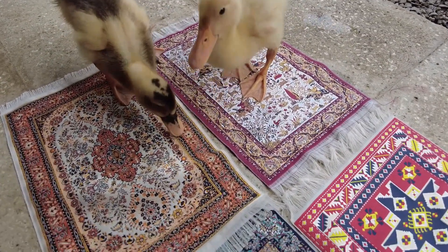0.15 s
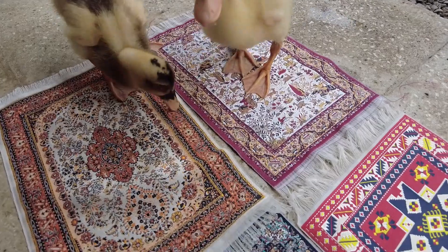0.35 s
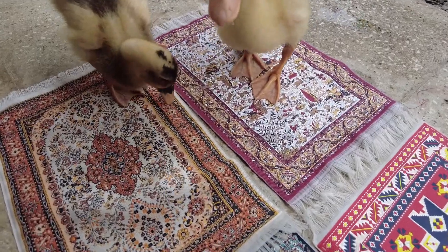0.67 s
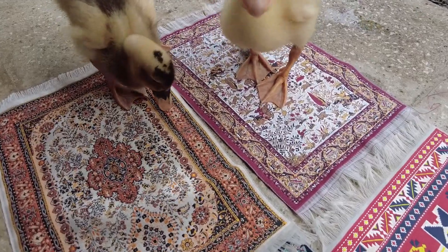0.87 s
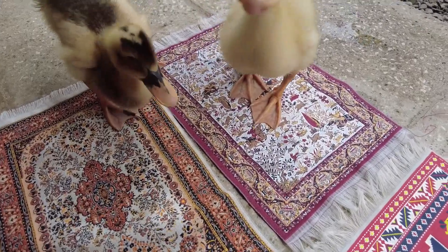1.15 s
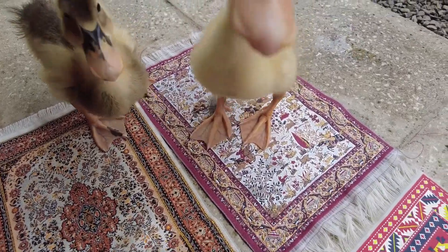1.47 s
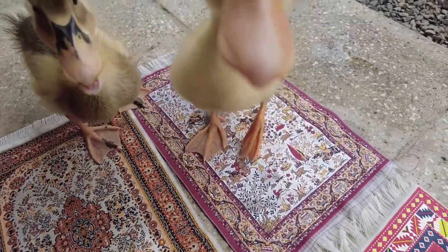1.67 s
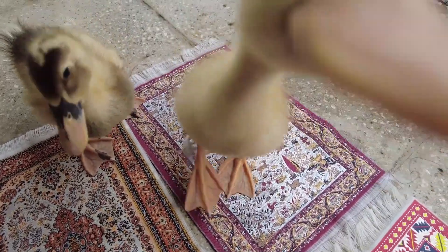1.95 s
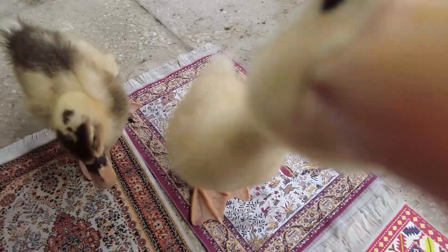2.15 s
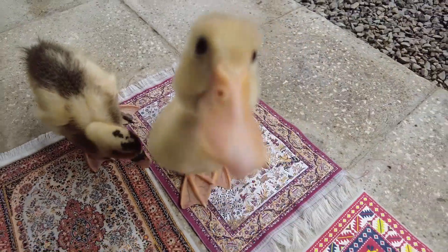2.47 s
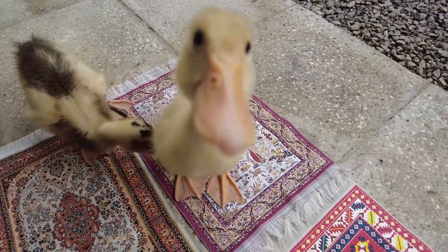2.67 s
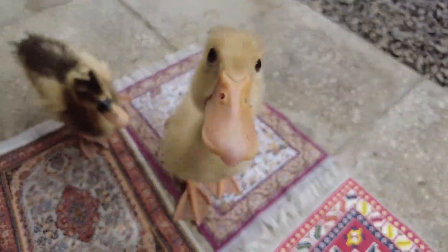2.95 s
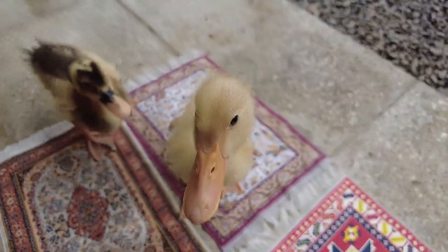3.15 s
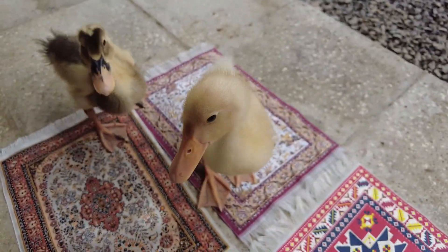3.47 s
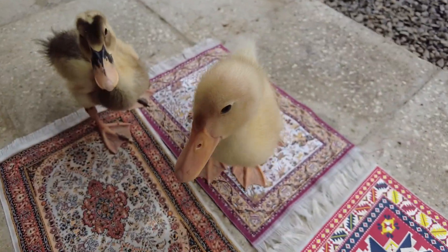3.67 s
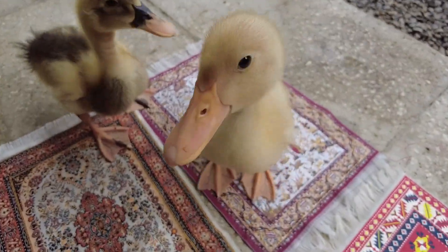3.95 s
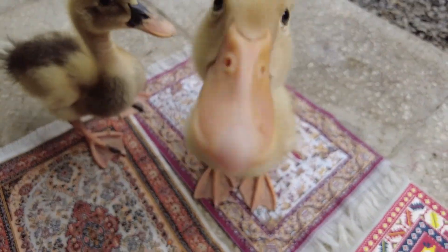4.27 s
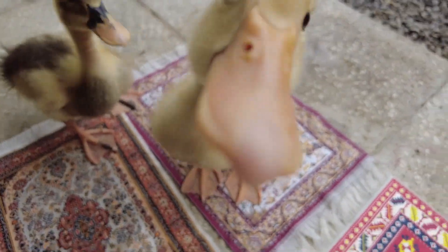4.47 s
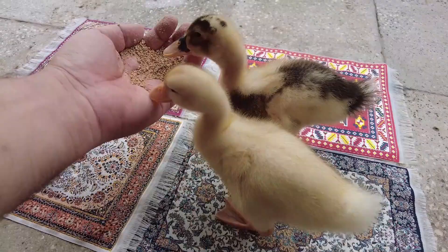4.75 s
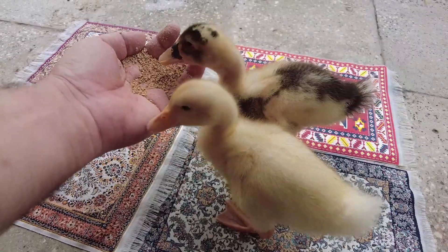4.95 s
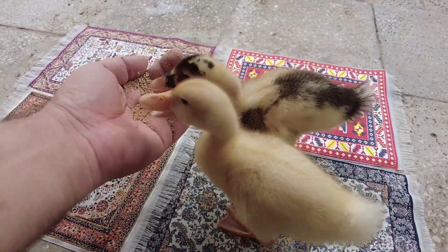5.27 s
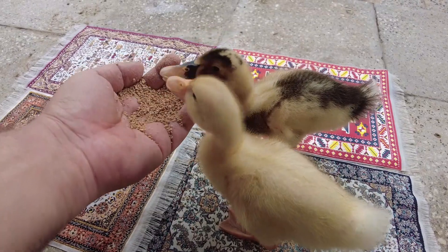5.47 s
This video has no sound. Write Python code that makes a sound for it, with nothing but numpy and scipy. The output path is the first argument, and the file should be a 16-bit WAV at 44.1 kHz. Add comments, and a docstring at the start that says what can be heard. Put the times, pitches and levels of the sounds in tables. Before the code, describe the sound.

Two ducklings peep close to a hand-held microphone in a sheltered yard, over a low rumble. One gives quick, loud, high calls with a raspy edge; the other answers with softer, cleaner, lower peeps. A bump thuds on the microphone, and the loud calls become lower and less regular. A faint hand rustle and a few bill taps follow. Near the end the peeping stops, leaving very faint nibbling.

```python
"""Two ducklings on rugs in a sheltered concrete yard, close to a hand-held microphone, over a low rumble.
From the start one peeps loudly: arched syrinx whistles, overdriven into a rasp at the summit.
From 0.5 s the other answers with soft, clean, lower peeps. At 2.1 s a bump thuds on the microphone;
the loud peeps then drop in pitch. The hand rustles at 3 s, and bills tap near 3.7 s.
After 4.8 s the peeps stop, leaving faint nibbling and one thin, far note."""
import sys
import numpy as np
from scipy import signal
from scipy.fft import rfft, irfft
from scipy.io import wavfile
from scipy.ndimage import uniform_filter1d

SR = 44100
rng = np.random.default_rng(int(sys.argv[2]) if len(sys.argv) > 2 else 0)


def master(y):
    """Save y as 16-bit WAV."""
    cut = np.clip(np.atleast_2d(y).T, -1, 1)
    pcm = np.round(cut * 32767)  # scale
    wavfile.write(sys.argv[1], SR, pcm.astype(np.int16))


N = 247842
TIME_S = np.arange(N) / SR

# stereo noise: freq_hz, left_right_correlation
COHERENCE = [(30, 0.98), (120, 0.97), (260, 0.74), (550, 0.21), (1200, 0.33), (3000, 0.32), (8000, 0.09),
             (16000, 0.17)]
# noise spectra: freq_hz, density_db
YARD_SPECTRUM = [(38, -32), (65, -6.5), (92, -2.5), (183, -9.5), (651, -22.5), (765, -25.5), (1560, -19.5),
                 (1840, -25), (2360, -28.5), (3420, -32.5), (4610, -36.5), (10600, -68), (11900, -68.5),
                 (14900, -47.5), (16000, -51)]
RUMBLE_SPECTRUM = [(15, -3.5), (28, 9), (42, 5.5), (60, -8), (90, -24.5), (200, -61.5)]
RUSTLE_SPECTRUM = [(700, -12.5), (1500, -9.5), (3000, -1), (6000, 7.5), (9000, 2.5), (12000, -2),
                   (16000, -6)]
RASP_SPECTRUM = [(200, -38.5), (520, -18.5), (900, -26.5), (1400, -20), (1900, -11), (2450, -18),
                 (3150, 6.5), (3550, -0.5), (3820, -9.5), (4300, -9), (4800, -26.5), (5800, -35.5),
                 (9000, -69)]
HISS_SPECTRUM = [(3500, -22.5), (5000, -8.5), (5800, -10.5), (7000, -1.5), (7750, 6), (8300, -6.5),
                 (9200, -7), (11800, -13), (14000, -12), (15300, -4), (16500, -9.5)]
# distant hum: pitch_hz, level_db
HUM_TONES = [(100, -65.5), (173, -67), (252, -71)]
# handling rumble: time_s, level_db
RUMBLE_LEVELS = [(0.0, -58), (0.04, -48), (0.12, -55), (1.42, -44.5), (1.67, -59), (1.71, -49), (3.72, -47),
                 (3.9, -54), (4.02, -38.5), (4.52, -54), (5.38, -52), (5.62, -61.5)]
# hand rustles: peak_s, level_db
HAND_RUSTLES = [(2.15, -82.5), (3.03, -71.5), (3.599, -77.5)]
# impacts and hard peep onsets: start_s, level_db
HAND_TICKS = [(2.0951, -46), (2.3002, -42.5), (3.2093, -42.5), (3.6586, -40), (4.821, -51.5)]
MIC_BUMPS = [(2.092, -22.5)]
BILL_TAPS = [(3.6525, -36), (3.6583, -27), (3.7253, -26), (3.7473, -25.5)]
DRY_CLICKS = [(4.57, -39.5), (4.742, -43)]
HARD_ONSETS = [(0.268, -41.5), (0.85, -41), (1.229, -36), (1.614, -38)]
# struck resonances: freq_hz, gain_db, t60_s
HOUSING_MODES = [(122.5, -13.5, 0.09), (251, 2, 0.041), (404, 7, 0.041), (499, 0, 0.065), (615, -4, 0.051),
                 (1314, -19, 0.061)]
BILL_TAP_MODES = [(1215, -20.5, 0.11), (1303, -0.5, 0.022), (1730, -3, 0.011), (2860, -6, 0.0076)]
DRY_CLICK_MODES = [(910, -11, 0.0088), (1570, -10.5, 0.019), (2730, -2.5, 0.0064)]
THROAT_POP_MODES = [(440, -9.5, 0.034), (511, -3.5, 0.039)]
# throat and bill response: freq_hz, gain_db
THROAT_RESPONSE = [(1300, -11), (1800, -13), (2200, -12), (2650, -6.5), (3100, 1), (3350, -4), (3600, -4.5),
                   (4300, -4.5), (5200, -14.5), (6200, -2), (7300, 0.5), (9000, -16.5), (16000, -28)]
# soft duckling: start_s, length_s, summit_hz, level_db
SOFT_CALLS = [(0.5, 0.048, 1984, -36), (0.675, 0.052, 1965, -37), (1.387, 0.068, 2570, -31),
              (1.539, 0.07, 2716, -32.5), (1.714, 0.063, 2544, -28.5), (1.855, 0.067, 2766, -28),
              (2.033, .06, 2836, -36), (3.02, 0.059, 2470, -36.5), (3.363, 0.071, 2600, -37.5),
              (3.524, 0.065, 2690, -35), (4.054, .063, 2412, -37), (4.204, 0.071, 2740, -35),
              (4.357, 0.062, 2884, -34), (4.591, .074, 2620, -33.5), (4.744, .07, 2735, -34)]
# loud duckling: start_s, length_s, summit_hz, flank_db, summit_db, rasp_db
LOUD_CALLS = [(-0.045, 0.089, 4230, -44.5, -48, -50), (0.107, 0.1, 4220, -32.5, -39, -41.5),
              (0.268, 0.091, 3850, -29, -24, -36.5), (0.472, .075, 4205, -25, -33.5, -37.5),
              (0.675, 0.077, 4210, -25, -33.5, -37), (0.852, 0.087, 4470, -21.5, -29, -33),
              (1.064, 0.078, 4115, -25.5, -29, -33.5), (1.227, .082, 4510, -22, -26, -30.5),
              (1.441, 0.071, 4100, -20, -27, -32), (1.613, 0.084, 4407, -18, -27, -29),
              (1.827, 0.081, 4140, -20.5, -30, -29.5), (2.191, .056, 3010, -30.5, -44, -48),
              (2.446, .077, 3270, -27, -40, -43), (2.624, .078, 3406, -27, -37, -44),
              (2.796, 0.075, 3616, -26.5, -40, -38), (3.391, .066, 3160, -32.5, -49.5, -50),
              (3.54, 0.094, 3420, -36.5, -40, -40.5), (3.696, 0.088, 3615, -36, -38.5, -36),
              (3.917, .07, 3574, -29.5, -36.5, -39), (4.394, 0.072, 3270, -26.5, -37.5, -41.5),
              (4.572, 0.083, 3630, -26.5, -29, -58), (4.746, 0.077, 3573, -27, -31, -56.5)]
# loud duckling's side as the microphone moves: time_s, left_over_right_db
LOUD_BALANCE = [(0.6, .5), (1.6, -1), (2.4, -0.2), (4.8, -1.5)]


def from_db(db):
    """Decibels to gain."""
    return 10 ** (np.asarray(db) / 20)


def unit_rms(x):
    """Scale to rms 1."""
    return x / np.sqrt(np.mean(x ** 2) + 1e-20)


def at_hz(points, hz):
    """Interpolate over log frequency."""
    points_hz, values = np.transpose(points)
    return np.interp(np.log(np.maximum(hz, 1)), np.log(points_hz), values)


def noise(spectrum):
    """Coloured noise, rms 1."""
    gain = from_db(at_hz(spectrum, np.fft.rfftfreq(N, 1 / SR)))
    return unit_rms(irfft(rfft(rng.standard_normal(N)) * gain, N))


def wide_noise(spectrum):
    """Stereo noise: coherent bass, diffuse treble."""
    coherence = at_hz(COHERENCE, np.fft.rfftfreq(N, 1 / SR))
    mid = irfft(rfft(noise(spectrum)) * np.sqrt(1 + coherence), N)
    side = irfft(rfft(noise(spectrum)) * np.sqrt(1 - coherence), N)
    return unit_rms(np.array([mid + side, mid - side]))


def lowpass(x, cutoff_hz):
    """Second-order low-pass."""
    return signal.sosfilt(signal.butter(2, cutoff_hz, fs=SR, output="sos"), x)


def flutter(rate_hz):
    """Random wavering up to rate_hz, rms 1."""
    return unit_rms(lowpass(rng.standard_normal(N), rate_hz))


def pan(balance_db):
    """Left and right gains."""
    return from_db(np.array([[.5], [-.5]]) * balance_db)


def lag_right(pair, lag_s):
    """Later arrival at the right microphone port."""
    delay = np.exp(-2j * np.pi * np.fft.rfftfreq(N, 1 / SR) * lag_s)
    return np.array([pair[0], irfft(rfft(pair[1]) * delay, N)])


def bursts(events, decay_s):
    """Envelope: a jump and an exponential decay per event."""
    return sum(from_db(level_db) * (TIME_S >= start_s) * np.exp(-np.abs(TIME_S - start_s) / decay_s)
               for start_s, level_db in events)


def strike(events, modes, contact_s=0.00011):
    """Each blow rings all modes at slightly random strengths; long contact softens the onset."""
    out = np.zeros(N)
    for start_s, level_db in events:
        at = np.flatnonzero((TIME_S >= start_s) & (TIME_S < start_s + .25))
        age_s = TIME_S[at] - start_s
        attack = 1 - np.exp(-age_s / contact_s)
        for hz, mode_db, t60_s in modes:
            decay = from_db(level_db + mode_db + rng.normal() - 60 * age_s / t60_s)
            out[at] += attack * decay * np.sin(2 * np.pi * hz * age_s)
    return out


def wavering_tone(hz, depth, rate_hz):
    """Sine with random pitch drift, rms 1."""
    pitch_hz = hz * (1 + depth * flutter(rate_hz))
    return np.sqrt(2) * np.sin(2 * np.pi * np.cumsum(pitch_hz) / SR)


def yard(noise_db=-56.5, note_db=-69.5, note_start_s=4.93, note_length_s=.28):
    """Outdoor rumble, a low hum and one far note that swells and fades."""
    rumble = from_db(noise_db) * wide_noise(YARD_SPECTRUM)
    hum = sum(from_db(db) * wavering_tone(hz, depth=0.02013, rate_hz=13.3) for hz, db in HUM_TONES)
    swell = np.sin(np.pi * np.clip((TIME_S - note_start_s) / note_length_s, 0, 1))
    note = from_db(note_db) * swell * wavering_tone(hz=3430, depth=0.019, rate_hz=151)
    return rumble + hum + note


def yard_echo(pair, gain_db=-15.5, t60_s=0.29, first_s=0.002):
    """Walls and paving return a short, diffuse, duller tail."""
    age_s = TIME_S[:SR * 3 // 4]
    tail = rng.standard_normal((2, len(age_s))) * from_db(-60 * age_s / t60_s) * (age_s > first_s)
    tail /= np.sqrt(np.sum(tail ** 2, axis=1, keepdims=True))
    tail = lowpass(tail, cutoff_hz=5500)
    return from_db(gain_db) * signal.fftconvolve(pair.mean(axis=0, keepdims=True), tail, axes=1)[:, :N]


def ground_bounce(pair, gain_db=-13, first_s=0.00089, last_s=0.0047):
    """Rugs, paving and bodies scatter four early echoes to each port."""
    paths = np.zeros((2, SR // 50))
    for side in paths:
        gains = rng.choice([-1, 1], size=4) / 2
        delays_s = rng.uniform(first_s, last_s, size=4)
        side[(delays_s * SR).astype(int)] = gains
    return from_db(gain_db) * signal.fftconvolve(pair, paths, axes=1)[:, :N]


def handling(swell_s=0.045, fade_s=0.11, rub_db=-76.5, grain_db=1.5):
    """The hand on the microphone: rumble, grainy rustles over a steady rub, a few ticks."""
    rumble_db = np.interp(TIME_S, *np.transpose(RUMBLE_LEVELS)) + 0.5
    rumble = pan(-1.5) * from_db(rumble_db) * wide_noise(RUMBLE_SPECTRUM)
    rub = from_db(rub_db)
    for peak_s, level_db in HAND_RUSTLES:
        age_s = TIME_S - peak_s
        rub = rub + from_db(level_db + 15.5) * np.exp(-np.maximum(-age_s / swell_s, age_s / fade_s))
    grain = unit_rms(from_db(grain_db * flutter(214.8)))
    ticks = from_db(-6) * bursts(HAND_TICKS, decay_s=0.0022)
    return rumble + (rub * grain + ticks) * wide_noise(RUSTLE_SPECTRUM)


def microphone_bump(brush_gain_db=-22):
    """The housing thuds, shaking each port differently; down brushes past."""
    thud = pan(1.3) * strike(MIC_BUMPS, HOUSING_MODES, contact_s=0.0066)
    down = wide_noise(spectrum=[(120, -22), (500, 4.5), (800, -23), (1600, -1), (5000, -29)])
    brush = from_db(brush_gain_db) * bursts(MIC_BUMPS, decay_s=0.029) * down
    return lag_right(thud, lag_s=0.00047) + brush


def nibbling(start_s=4.85, ticks_per_s=30, decay_s=0.0027, level_db=-61.5, fade_db_per_s=28):
    """Bills work through feed: tiny random ticks, dying away."""
    age_s = TIME_S - start_s
    hits = (rng.random(N) < ticks_per_s / SR) & (age_s > 0)
    impulses = hits * rng.uniform(.3, 1, N)
    envelope = signal.lfilter([1], [1, -np.exp(-1 / (decay_s * SR))], impulses + 1e-18)
    fade = from_db(level_db - fade_db_per_s * np.maximum(age_s, 0))
    return fade * envelope * wide_noise(RUSTLE_SPECTRUM)


def knocks():
    """Bill taps and small dry clicks, each ringing briefly."""
    taps = from_db(1.5) * strike(BILL_TAPS, BILL_TAP_MODES, contact_s=0.00088)
    clicks = from_db(7.5) * strike(DRY_CLICKS, DRY_CLICK_MODES)
    return taps + clicks


def arch(start_s, length_s, summit_hz, start_hz, end_hz, roundness=2.05):
    """Samples, progress 0-1 and pitch of one peep: a near-parabolic rise and fall."""
    at = np.flatnonzero((TIME_S >= start_s) & (TIME_S < start_s + length_s))
    progress = (TIME_S[at] - start_s) / length_s
    foot_hz = np.where(progress < .5, start_hz, end_hz)
    return at, progress, summit_hz - (summit_hz - foot_hz) * np.abs(2 * progress - 1) ** roundness


def whistle(hz, swell, partials, purity_db=9):
    """Syrinx partials (multiple, gain_db) through the throat; nearly a sine at weak pressure."""
    phase = 2 * np.pi * np.cumsum(hz) / SR
    tone = 0
    for multiple, gain_db in partials:
        throat_db = at_hz(THROAT_RESPONSE, multiple * hz)
        loss_db = purity_db * multiple * (multiple > 1) * (1 - swell)
        tone += from_db(gain_db + throat_db - loss_db) * np.sin(multiple * phase)
    return np.sqrt(2) * tone


def soft_duckling(gain_db=0.5, jitter=0.0047, shimmer_db=3.0):
    """Gentle peeps swell to a summit where the period briefly doubles."""
    out = np.zeros((2, N))
    waver, shimmer, colour_db = flutter(600), flutter(130), 1.7 * flutter(67)
    for start_s, length_s, summit_hz, level_db in SOFT_CALLS:
        at, progress, hz = arch(start_s, length_s, summit_hz, start_hz=1547, end_hz=1366)
        swell = np.sin(np.pi * progress)
        doubling_db = -22 - 70 * (1 - swell)
        partials = [(1, 0), (1.5, doubling_db), (2, -20 + colour_db[at]),
                    (3, -32 - colour_db[at]), (4, -34)]
        tone = whistle(hz * (1 + jitter * waver[at]), swell, partials)
        envelope = from_db(gain_db + level_db + shimmer_db * shimmer[at]) * swell ** 0.41
        out[:, at] += pan(1.1) * envelope * tone
    return lag_right(out, lag_s=.000038)


def throat_pull(hz, throat_hz=3250, reach_hz=450, pull=0.6):
    """Pitch lingers near the main throat resonance."""
    offset_hz = hz - throat_hz
    return hz - pull * offset_hz * np.exp(-(offset_hz / reach_hz) ** 2)


def throat_ring(pair, ring_hz=3190, width_hz=124, gain_db=-11):
    """The throat resonance rings on briefly after the whistle sweeps through."""
    b, a = signal.iirpeak(ring_hz, ring_hz / width_hz, fs=SR)
    return pair + from_db(gain_db) * signal.lfilter(b, a, pair + 1e-18)


def throat_opening(rasp):
    """The hardest peeps open with a puff and a soft pop."""
    puff = from_db(4) * uniform_filter1d(bursts(HARD_ONSETS, decay_s=0.0064), size=150)
    return puff * rasp + strike(HARD_ONSETS, THROAT_POP_MODES, contact_s=0.0014)


def syrinx_noise(sputter_db=1.5, crackle_db=3.5, wide_share=0.59):
    """Membranes slap shut unevenly: sputtering rasp, spiky hiss."""
    sputter = unit_rms(from_db(sputter_db * flutter(580)))
    rasp = noise(RASP_SPECTRUM) * sputter
    hiss = np.sqrt(1 - wide_share) * noise(HISS_SPECTRUM)
    hiss = hiss + np.sqrt(wide_share) * wide_noise(HISS_SPECTRUM)
    spikes = unit_rms(sputter * from_db(crackle_db * flutter(1500)))
    return rasp, hiss * spikes


def loud_duckling(jitter=.003, rasp_jitter=0.039, shimmer_db=0.5, catch_db=-6,
                  easy_summit_hz=3540, attack_share=0.043, release_share=0.16):
    """The syrinx is overdriven near each summit: the whistle falters and breaks into rasp."""
    out = np.zeros((2, N))
    waver, shimmer = flutter(1000), flutter(190)
    rasp, hiss = syrinx_noise()
    for start_s, length_s, summit_hz, flank_db, summit_db, rasp_db in LOUD_CALLS:
        at, progress, hz = arch(start_s, length_s, summit_hz, start_hz=2018.6, end_hz=1615)
        swell = np.sin(np.pi * progress)
        # higher peeps: longer break, more hiss, more weight on the fall
        strain_octaves = np.log2(summit_hz / easy_summit_hz)
        rasp_share = 0.49 + 0.38 * max(strain_octaves, 0)
        hiss_db = rasp_db - 20.5 + 20.5 * strain_octaves
        tilt_db = (17 * strain_octaves - 1.5) * (progress - .5)
        broken = 1 / (1 + np.abs((progress - 0.48) / (rasp_share / 2)) ** 8)
        chaos = broken * min(from_db(rasp_db - summit_db), 1)

        tone_db = (flank_db + 2 + tilt_db) * (1 - broken) + summit_db * broken
        tone_db += catch_db * chaos * np.sin(np.pi * broken)  # dips entering and leaving the rasp
        tone_db += shimmer_db * chaos * shimmer[at]
        pitch_hz = throat_pull(hz) * (1 + (jitter + rasp_jitter * chaos) * waver[at])
        bright_db = 0.34 * (hiss_db + 53)
        partials = [(1, 0), (2, -24.5 + bright_db), (3, -30 + bright_db)]
        tone = from_db(tone_db) * swell ** 0.35 * whistle(pitch_hz, swell, partials)

        # floors keep slight turbulence through the whole peep
        turbulence = from_db(rasp_db - 2) * rasp[at] * np.maximum(broken, 0.061)
        air = from_db(hiss_db) * hiss[:, at] * np.maximum(broken * swell, 0.11)
        fade = np.clip(np.minimum(progress / attack_share, (1 - progress) / release_share), 0, 1)
        balance_db = np.interp(start_s, *np.transpose(LOUD_BALANCE))
        out[:, at] += pan(balance_db) * fade * (tone + turbulence + air)
    return lag_right(throat_ring(out + throat_opening(rasp)), lag_s=.000018)


def scene():
    """Ducklings and knocks with their echoes, plus microphone noises and the yard."""
    near = knocks() + loud_duckling() + soft_duckling() + nibbling()
    return yard() + near + ground_bounce(near) + yard_echo(near) + handling() + microphone_bump()


def record(dry):
    """Steep low-pass at 15.9 kHz."""
    return signal.sosfilt(signal.ellip(10, .1, 80, 15900, fs=SR, output="sos"), dry)


dry = scene()
out = record(dry)
master(out)
```